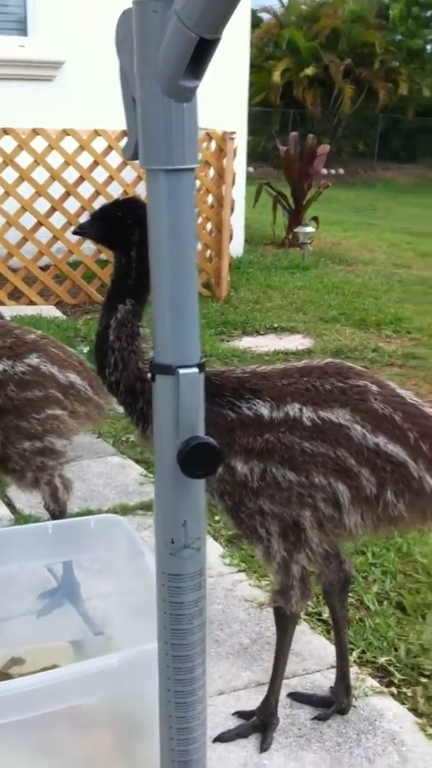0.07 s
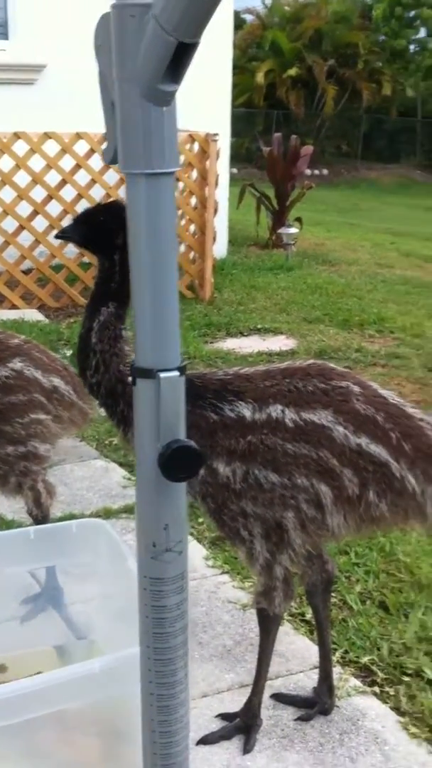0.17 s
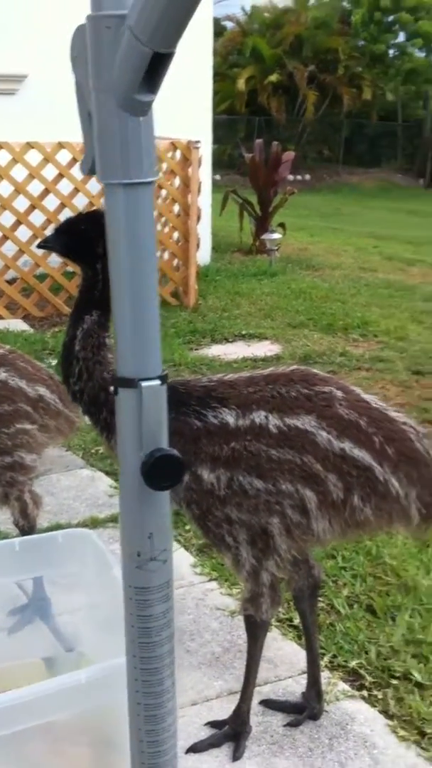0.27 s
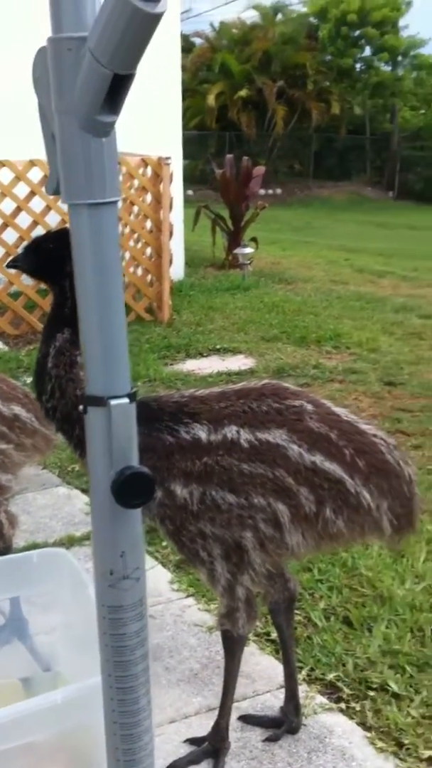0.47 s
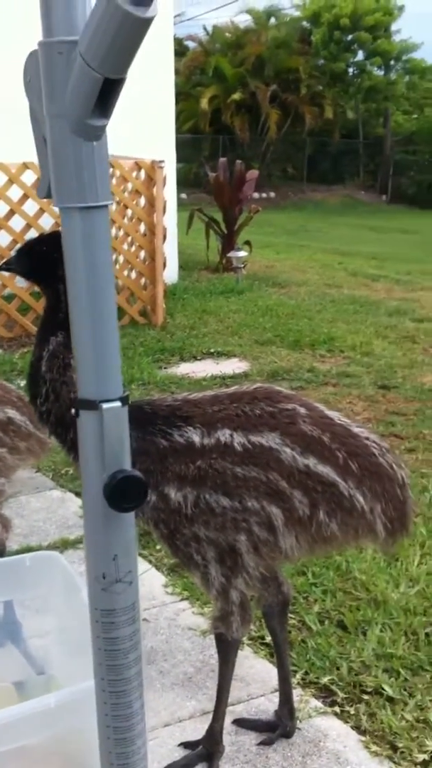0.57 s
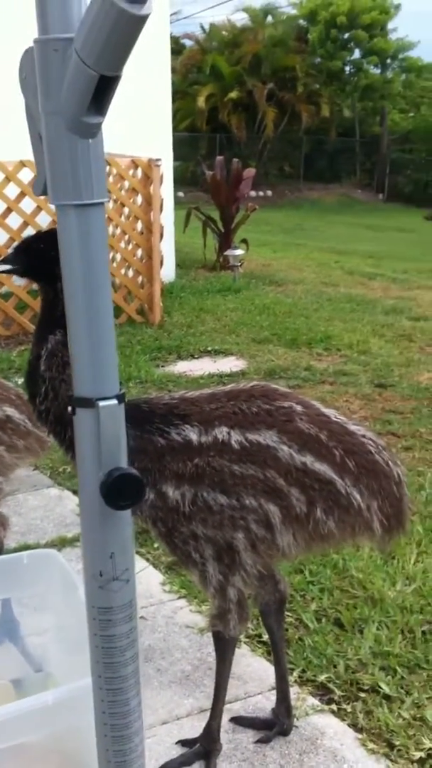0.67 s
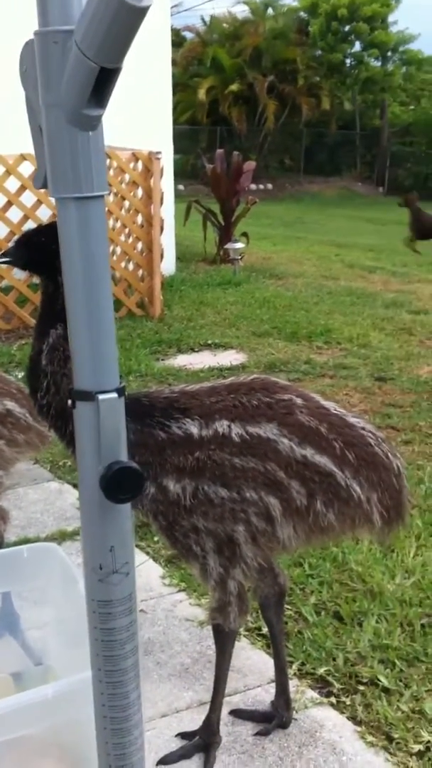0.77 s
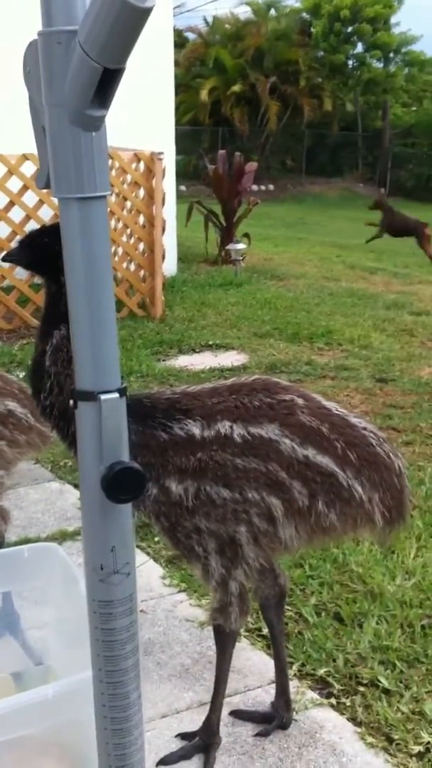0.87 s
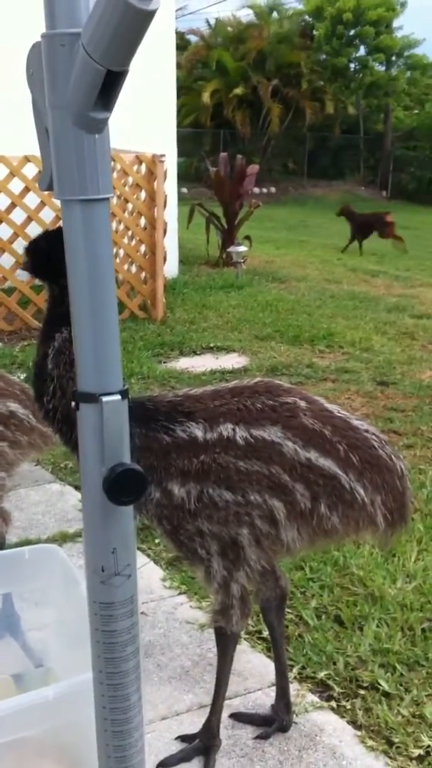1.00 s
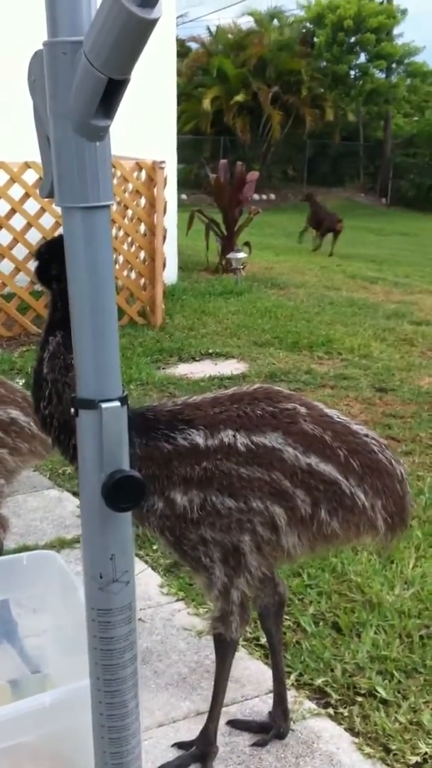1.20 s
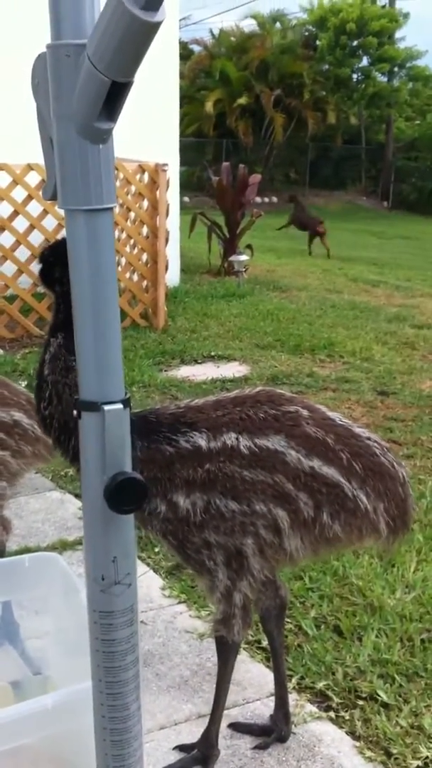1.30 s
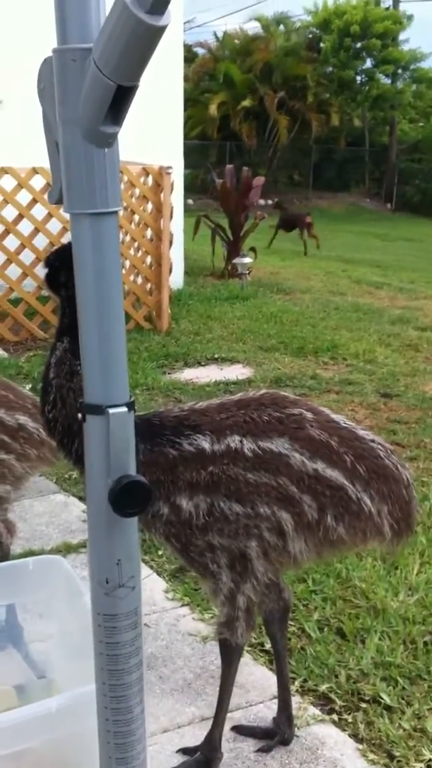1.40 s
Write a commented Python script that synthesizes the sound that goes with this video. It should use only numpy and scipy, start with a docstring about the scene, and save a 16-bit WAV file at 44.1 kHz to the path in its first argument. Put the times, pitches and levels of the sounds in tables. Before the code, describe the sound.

A young emu close to the microphone creaks low, then gives one hoarse, shaking squawk that rings briefly in a garden. A second faint creak starts at the end, over a soft outdoor rumble and very faint insects.

```python
"""A young emu close by in a garden gives one hoarse squawk: a low creak with the beak nearly shut,
then a rasping, shaking cry. Its voice is a train of tiny pulses, shaped by the throat and beak.
Paving and house wall throw it back and the garden lets it ring out; a second creak begins at the end.
Behind it are a soft outdoor rumble, a thin band of insects and one tiny far chirp."""
import sys
import numpy as np
from scipy import signal
from scipy.fft import rfft, irfft, next_fast_len
from scipy.io import wavfile
from scipy.ndimage import uniform_filter1d, map_coordinates

SR = 44100
rng = np.random.default_rng(int(sys.argv[2]) if len(sys.argv) > 2 else 0)


def persist_wave(psi):
    """Save psi, clipped to +-1, as 16-bit WAV."""
    counts = np.round(np.clip(psi, -1, 1) * 32767).astype(np.int16)
    wavfile.write(sys.argv[1], SR, np.atleast_2d(counts).T)


N = 63945
T = np.arange(N) / SR


def amp(db):
    """Turn decibels (dB) into a number to multiply a sound by."""
    return 10 ** (np.asarray(db) / 20)


def unit(x):
    """Scale a sound so that its average power is 1."""
    return x / np.sqrt(np.mean(x ** 2) + 1e-20)


def along(points, hz):
    """Read between (Hz, value) points, giving each octave the same room."""
    freqs, values = np.transpose(points)
    return np.interp(np.log(hz + 1), np.log(freqs + 1), values)


def curves(rows):
    """Turn each column after the time into one value per sample."""
    times, *columns = np.transpose(rows)
    return [np.interp(T, times, column) for column in columns]


def wobble(rate):
    """A smooth random curve through `rate` random values a second."""
    return map_coordinates(rng.standard_normal(N), [T * rate], mode="mirror")


def coloured(x, points):
    """Make each frequency louder or softer, following (Hz, dB) points."""
    size = 2 * next_fast_len(N)
    cepstrum = irfft(np.log(amp(along(points, np.fft.rfftfreq(size, 1 / SR)))))
    # Folding this in half makes the filter ring after a pulse, never before it.
    cepstrum[1:size // 2] *= 2
    cepstrum[size // 2 + 1:] = 0
    return irfft(rfft(x, size) * np.exp(rfft(cepstrum)))[:N]


def narrow(hz, width_hz):
    """A narrow band of noise around one frequency."""
    band = np.exp(-.5 * ((np.fft.rfftfreq(N, 1 / SR) - hz) / width_hz) ** 2)
    return unit(irfft(rfft(rng.standard_normal(N)) * band, N))


def rumble():
    """Soft, low outdoor noise at an almost steady level."""
    # The tone of the rumble. Each row: frequency in Hz, relative level in dB.
    tone = [(15, -93), (25, -41.5), (59, -14), (91, -11), (129, 1.5), (260, -3.5), (289, -1), (445, -8),
            (482, -6.5), (1110, -10.5), (2420, -25), (4870, -27), (6730, -29.5), (8580, -30.5),
            (15500, -31.5)]
    return amp(-55 + 0.2 * wobble(6.9)) * unit(coloured(rng.standard_normal(N), tone))


def insects():
    """Insects make a thin, high hiss that wavers a little."""
    return amp(-72 + 1.4 * wobble(10.5)) * narrow(hz=6750, width_hz=240)


def pulses(phase, jitter=.01, scatter_db=1.8):
    """One click per voice cycle, uneven in time (jitter, in cycles) and in size (scatter_db)."""
    cycle = np.arange(1, int(phase[-1]))
    chance = rng.standard_normal((N // 20, 2))[:len(cycle)]
    at = np.interp(cycle + jitter * chance[:, 0], phase, np.arange(N))
    size = amp(scatter_db * chance[:, 1] + .8 * (-1) ** cycle)  # every other click is a bit stronger
    taps = at.astype(int)[:, None] + np.arange(-7, 9)
    offset = taps - at[:, None]
    click = np.sinc(offset) * np.sinc(offset / 8)  # lets a click fall between samples
    train = np.bincount(np.clip(taps, 0, N - 1).ravel(), (size[:, None] * click).ravel(), N)
    return unit(train - train.mean())


def voice(pitch, rough, clear_tone, rasp_tone):
    """The voice box pulses evenly; roughness mixes in ragged pulses, air puffs and a second pitch."""
    waver_rate, second_hz = 150, 481.7
    phase = np.cumsum(pitch * (1 + .01 * wobble(waver_rate))) / SR
    clear = unit(coloured(pulses(phase), clear_tone))
    puffs = unit(rng.standard_normal(N) * np.exp(0.85 * np.cos(2 * np.pi * phase)))
    second = pulses(np.cumsum(second_hz * (1 + 0.01792 * wobble(waver_rate))) / SR)
    ragged = pulses(phase, jitter=0.2224, scatter_db=-5)
    rasp = unit(coloured(ragged + amp(1.5) * puffs + amp(-4) * second, rasp_tone))
    return np.sqrt(1 - rough) * clear + np.sqrt(rough) * rasp


def creaks():
    """Two low creaks: slow, soft pulses behind a nearly shut beak."""
    # How the voice moves, one list per creak.
    # Each row: time in seconds, pulses per second, level in dB, treble boost or cut in dB.
    moves = [
        [(.066, 232.5, -61, -13), (.072, 238.9, -45, -10), (.088, 238.7, -79, -10), (.097, 246.1, -45, -9),
         (.121, 240.7, -38, -15), (.128, 254, -44.5, 5), (.16, 257.2, -38.5, -4), (.184, 250.2, -45, -5),
         (.2, 234.1, -27, -7), (.208, 247.4, -40.5, 0), (.228, 235, -30.5, -8), (.26, 229.6, -44.5, -8)],
        [(1.375, 215, -76, -2), (1.41, 223, -50.5, -9), (1.43, 241.7, -49, -5), (1.45, 235, -45, -5)],
    ]
    # The tone of the beak, one list per creak. Each row: frequency in Hz, relative level in dB.
    beak_tones = [
        [(300, -25.5), (900, -29), (1080, -11), (1270, 0.5), (1450, -4), (1700, -8.5), (2080, -5.5),
         (2450, -16), (2950, -8.5), (3400, -19.5), (3900, -18), (4500, -22.5), (5100, -25.5), (5700, -32),
         (14000, -52)],
        [(300, -30), (850, -13), (1200, 0), (1330, -10.5), (1460, -4), (1900, -18.5), (2700, -9), (3500, -21),
         (4300, -9), (5400, -23.5), (7000, -32), (14000, -37)],
    ]
    treble_hz = 1700
    low_pass = signal.butter(4, treble_hz, fs=SR, output="sos")
    sound = np.zeros(N)
    for rows, beak in zip(moves, beak_tones):
        pitch, level_db, treble_db = curves(rows)
        creak = voice(pitch, rough=.18, clear_tone=beak, rasp_tone=beak)
        low = signal.sosfiltfilt(low_pass, creak)
        sounding = (T >= rows[0][0]) & (T <= rows[-1][0])
        soft_gate = uniform_filter1d(1. * sounding, size=200)
        sound += soft_gate * amp(level_db) * (low + amp(treble_db) * (creak - low))
    return sound


def squawk():
    """The open-beaked cry comes in surges, slipping between clear and rasping over a hiss of air."""
    # The surges that shake the cry. Each row: start in seconds, hold in seconds, relative level in dB.
    surges = [(.213, .019, -27), (0.243, 0.028, -25), (0.282, 0.022, -22.5), (0.312, 0.034, -22),
              (0.355, 0.043, -21.5), (0.4, 0.055, -21.5), (0.447, 0.041, -20.5), (0.493, 0.052, -20),
              (0.554, 0.018, -28)]
    # The tune of the cry. Each row: time in seconds, pitch in Hz.
    tune = [(.21, 376), (.232, 386), (.25, 379), (.27, 388), (.288, 411), (.325, 418), (.35, 411),
            (.378, 417), (.41, 418), (.435, 438), (.46, 446), (.488, 456), (.506, 429), (.535, 405),
            (.549, 417), (.57, 402)]
    # How hoarse it is. Each row: time in seconds, rough share from 0 to 1.
    hoarseness = [(.225, .6), (.255, .42), (.29, .42), (.33, .22), (.352, .42), (.378, .22), (.4, .66),
                  (.44, .74), (.485, .64), (.506, .2), (.56, .18)]
    # The tones of the clear voice in the open throat, the rasp, and air hissing through the beak.
    # Each row: frequency in Hz, relative level in dB.
    throat_tone = [(40, -80), (200, -55), (440, -36), (620, -30), (830, -13), (1020, -15), (1230, -9),
                   (1660, -.5), (2080, -3.5), (2490, -.5), (2900, -5), (3320, -7), (3750, -17), (4150, -19),
                   (4600, -15), (5500, -30), (7000, -43), (15500, -65)]
    rasp_tone = [(40, -79), (200, -35), (450, -26.5), (650, -26), (850, -12), (1020, -16), (1220, -5),
                 (1440, 1), (1570, -3), (1800, 3), (2100, -7.5), (2600, -5), (3400, -13), (4000, -11.5),
                 (4900, -24.5), (5900, -31.5), (15500, -68)]
    hiss_tone = [(40, -86), (1500, -38), (3000, -6.5), (3600, 1.5), (4900, -4), (5900, -13), (7300, -18.5),
                 (9000, -19), (12000, -31.5), (15500, -45)]
    attack_s, release_s, sag_db_per_s = 0.0052, .017, 41.5
    effort = np.zeros(N)
    for start, hold, db in surges:
        age = np.maximum(T - start, 0)
        rise = np.minimum(age / attack_s, 1)
        fall = np.exp(-np.maximum(age - hold, 0) / release_s)
        effort = np.maximum(effort, amp(db - sag_db_per_s * age) * rise * fall)
    (pitch,), (rough,) = curves(tune), curves(hoarseness)
    hiss = amp(-15) * unit(coloured(rng.standard_normal(N), hiss_tone))
    return amp(-1) * effort * (voice(pitch, rough, throat_tone, rasp_tone) + hiss)


def near_echoes(x):
    """Paving, pole and wall smear the pulses in time without changing their tone."""
    # Quick reflections. Each row: delay in seconds, strength from 0 to 1.
    echoes = [(.0009, .4), (.0031, .3), (.0067, .16)]
    size = 2 * next_fast_len(N)
    spectrum = rfft(x, size)
    for delay, strength in echoes:
        late = np.exp(-2j * np.pi * np.fft.rfftfreq(size, 1 / SR) * delay)
        spectrum = spectrum * (late - strength) / (1 - strength * late) / late
    return irfft(spectrum, size)[:N]


def garden(x):
    """The garden adds a weak wash of echoes that dies away."""
    # How long the garden rings. Each row: frequency in Hz, seconds to fade by 60 dB.
    ring_times = [(500, 0.43), (1700, 0.64), (4500, 0.57), (10000, 1)]
    # The tone it sends back. Each row: frequency in Hz, relative level in dB.
    tone = [(400, -2), (1200, -2), (1750, 3), (2200, -2.5), (2500, 1), (3100, -2.5), (3450, 4), (4200, 1.5),
            (10000, 3.5)]
    hz, t, noise = signal.stft(rng.standard_normal(SR), SR, nperseg=256)
    fade = amp(-60 * t / along(ring_times, hz)[:, None])
    tail = signal.istft(noise * fade, SR, nperseg=256)[1][:SR]
    return x + amp(-12) * signal.fftconvolve(coloured(x, tone), tail / np.linalg.norm(tail))[:N]


def far_chirp():
    """One tiny far chirp: a high band of noise that swells and fades in an instant."""
    peak_s, width_s = 1.07, 0.01
    swell = np.exp(-.5 * ((T - peak_s) / width_s) ** 2)
    return amp(-64.5) * swell * narrow(hz=6000, width_hz=220)


def scene():
    """The emu and its echoes over the garden's quiet background, in one channel."""
    emu = squawk() + creaks()
    return (garden(near_echoes(emu)) + rumble() + insects() + far_chirp())[None]


def record(dry):
    """Cut away the very highest treble."""
    top_hz = 15750
    size = 2 * next_fast_len(N)
    kept = np.fft.rfftfreq(size, 1 / SR) < top_hz
    return irfft(rfft(dry, size) * kept, size)[:, :N]


dry = scene()
out = record(dry)
persist_wave(out)
```